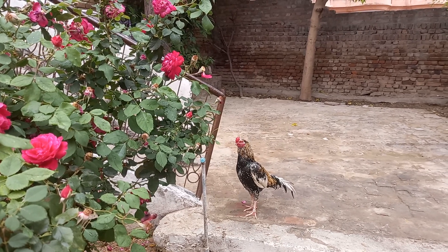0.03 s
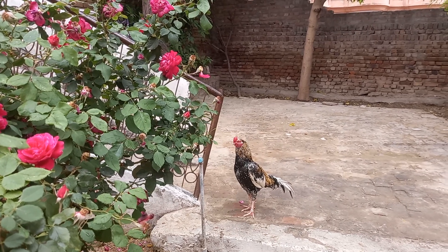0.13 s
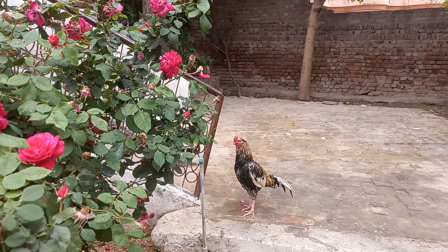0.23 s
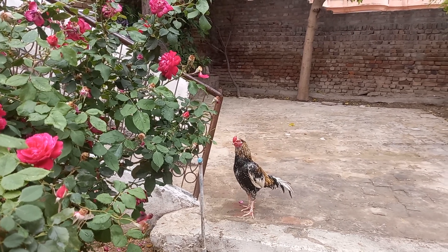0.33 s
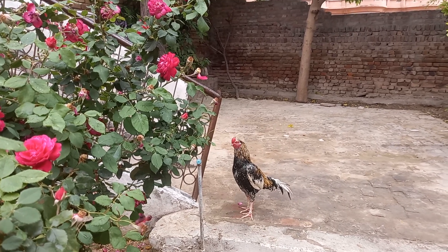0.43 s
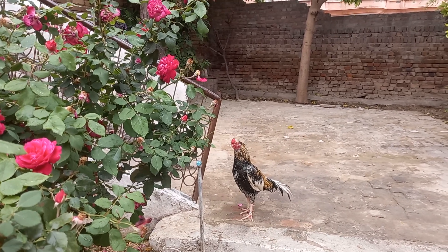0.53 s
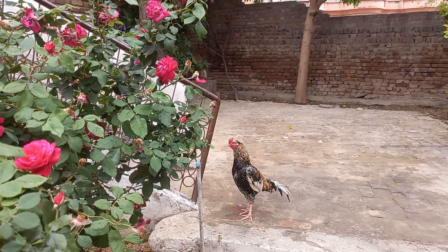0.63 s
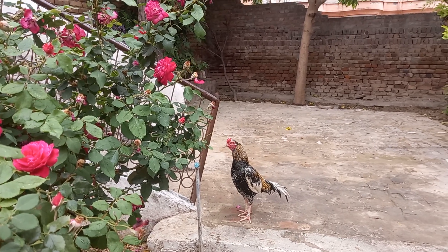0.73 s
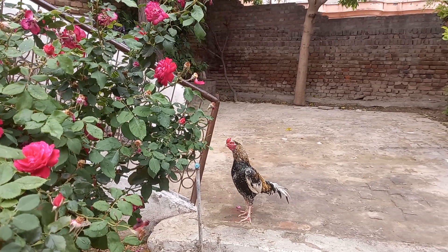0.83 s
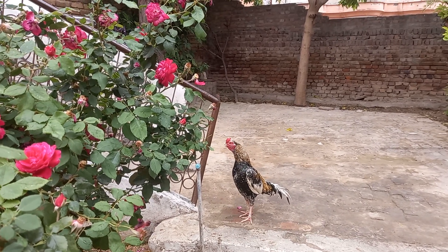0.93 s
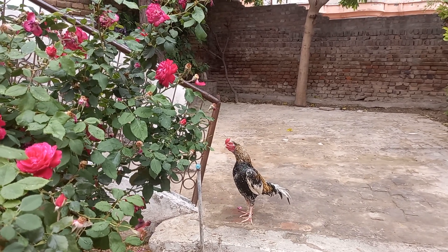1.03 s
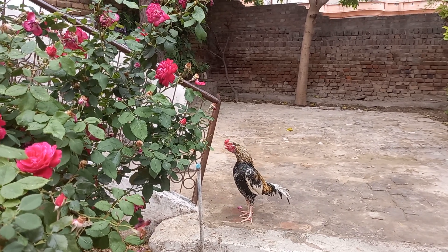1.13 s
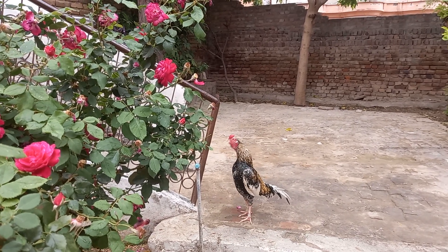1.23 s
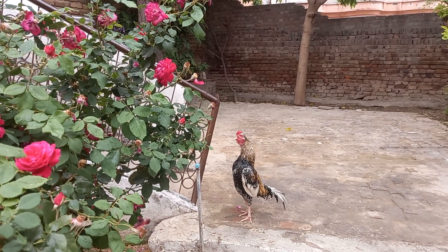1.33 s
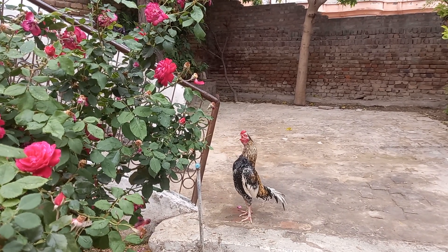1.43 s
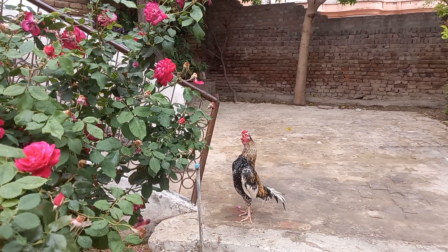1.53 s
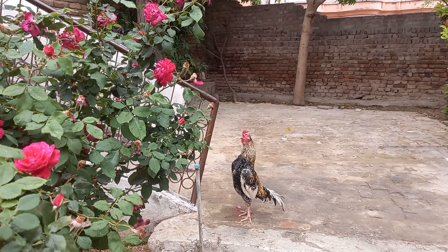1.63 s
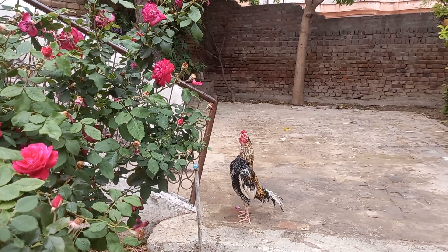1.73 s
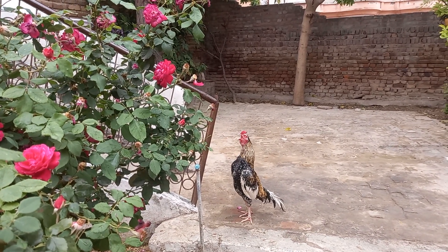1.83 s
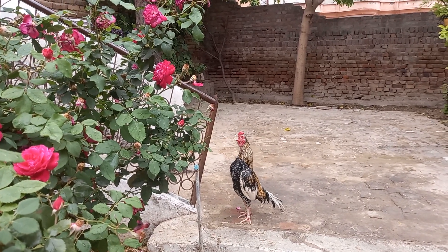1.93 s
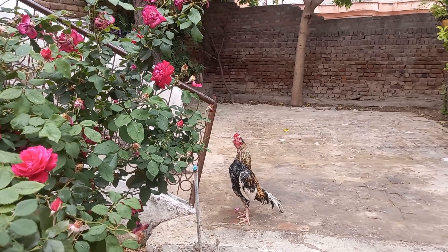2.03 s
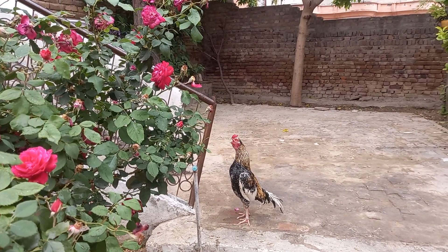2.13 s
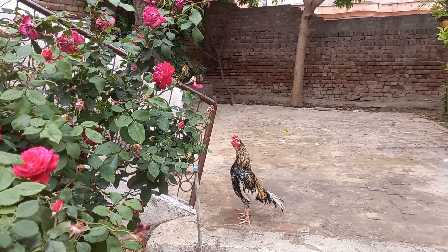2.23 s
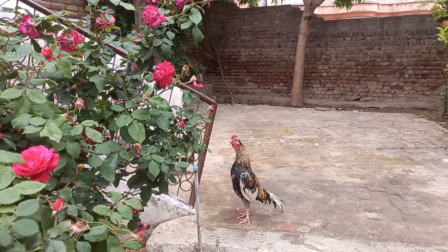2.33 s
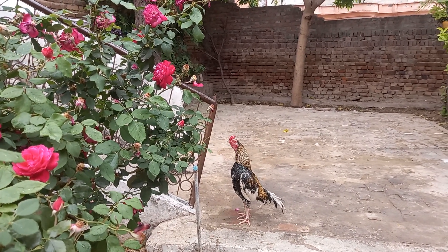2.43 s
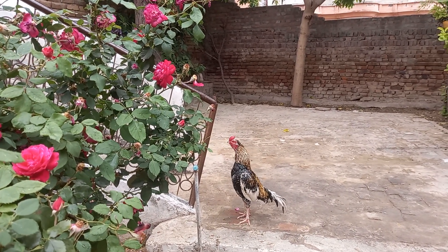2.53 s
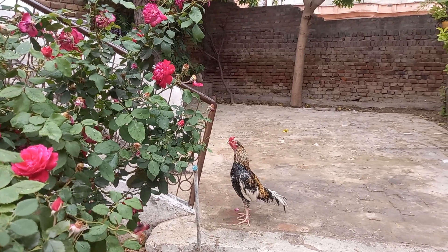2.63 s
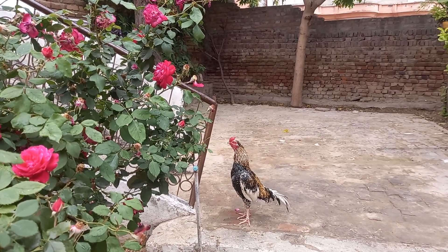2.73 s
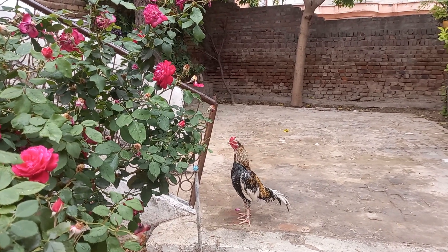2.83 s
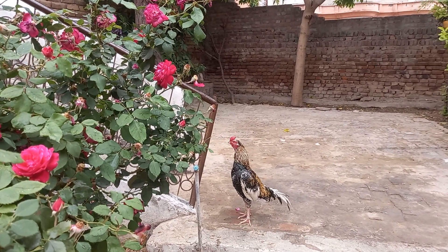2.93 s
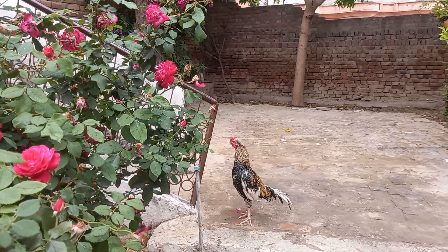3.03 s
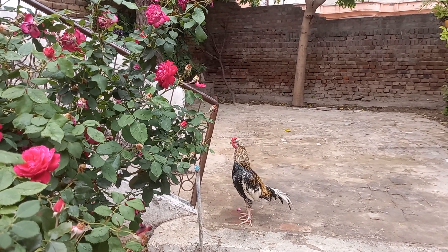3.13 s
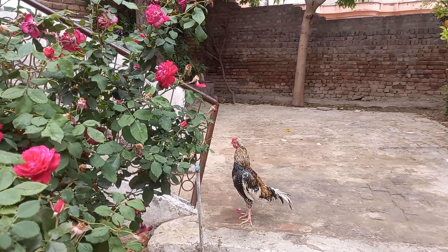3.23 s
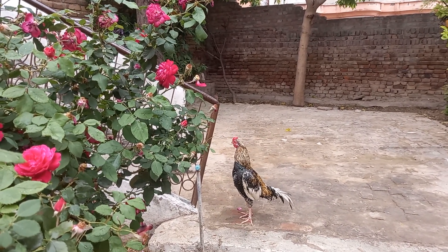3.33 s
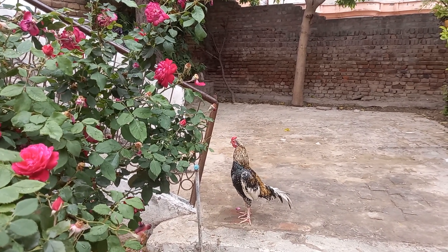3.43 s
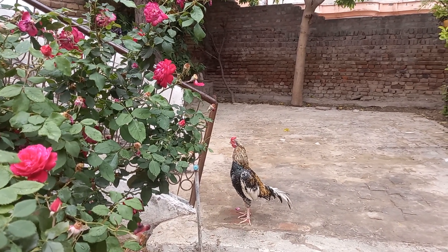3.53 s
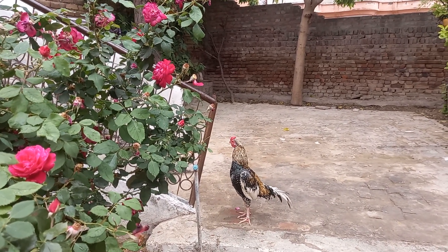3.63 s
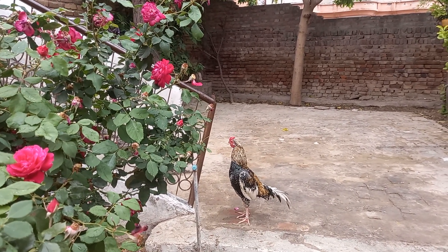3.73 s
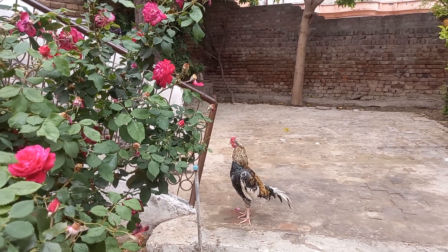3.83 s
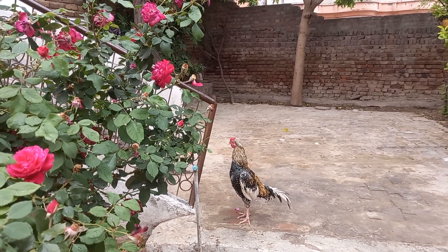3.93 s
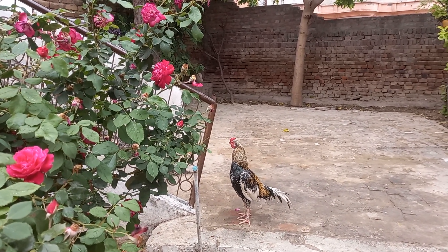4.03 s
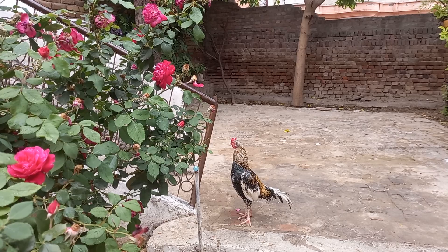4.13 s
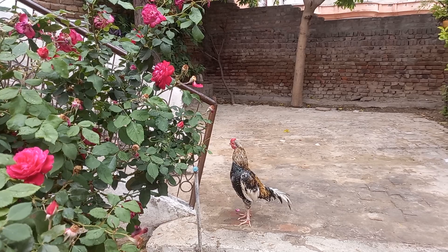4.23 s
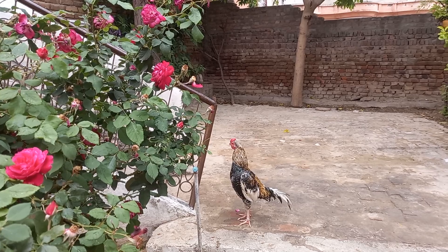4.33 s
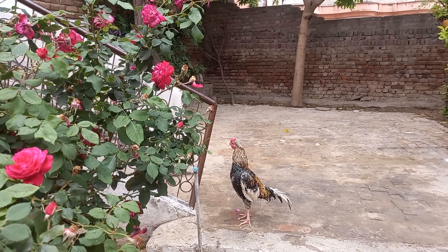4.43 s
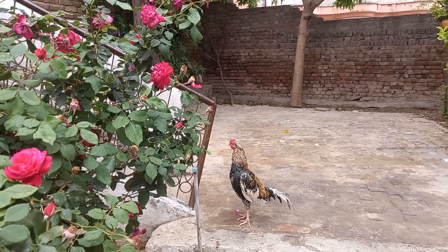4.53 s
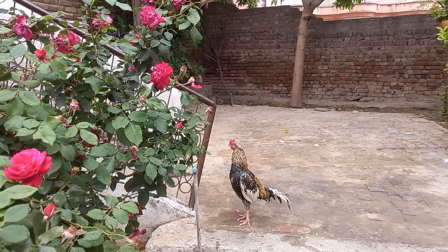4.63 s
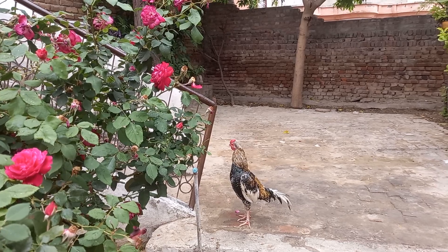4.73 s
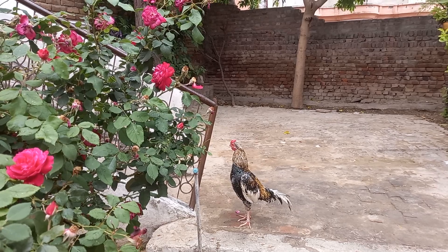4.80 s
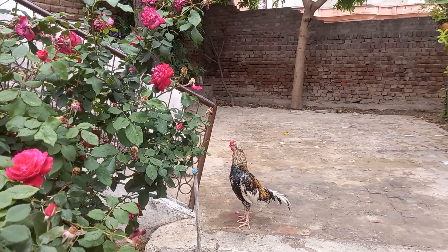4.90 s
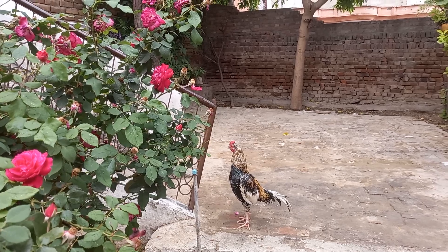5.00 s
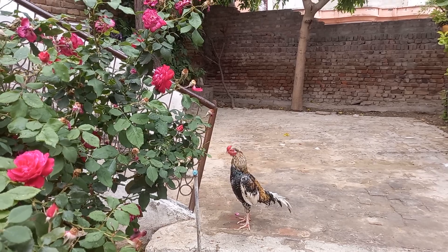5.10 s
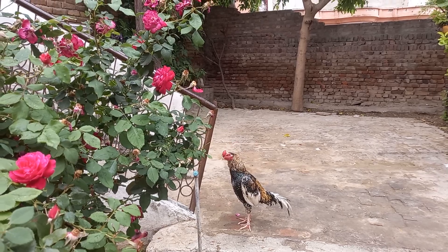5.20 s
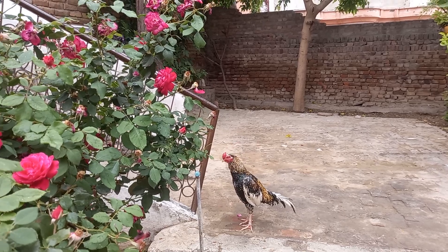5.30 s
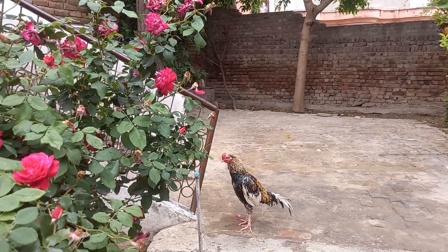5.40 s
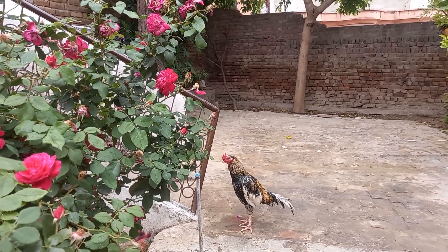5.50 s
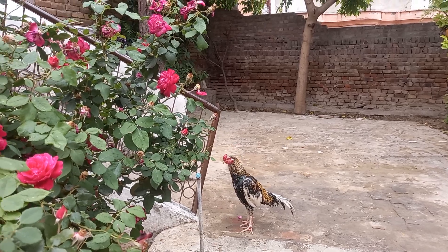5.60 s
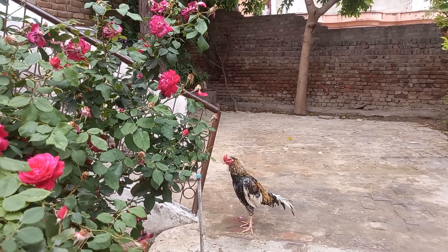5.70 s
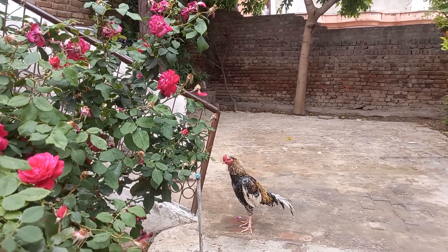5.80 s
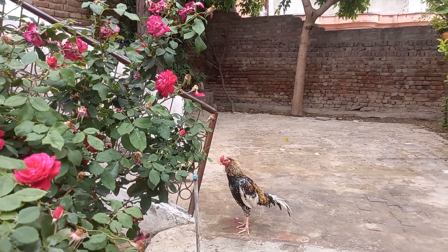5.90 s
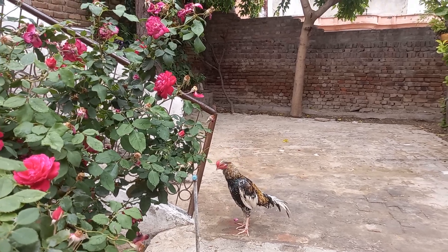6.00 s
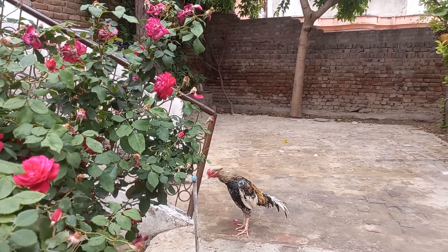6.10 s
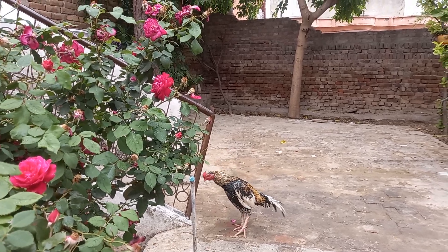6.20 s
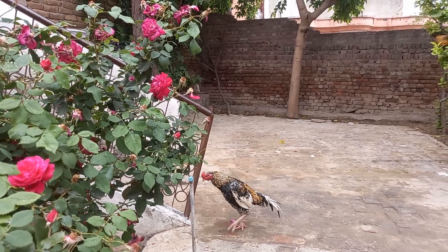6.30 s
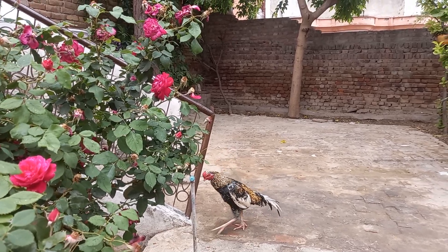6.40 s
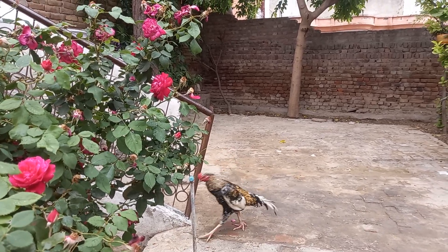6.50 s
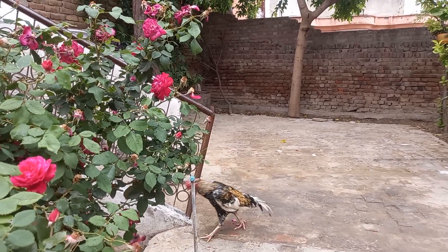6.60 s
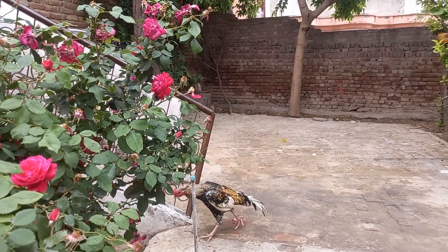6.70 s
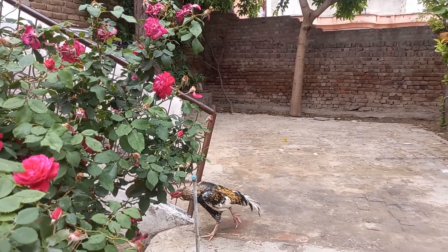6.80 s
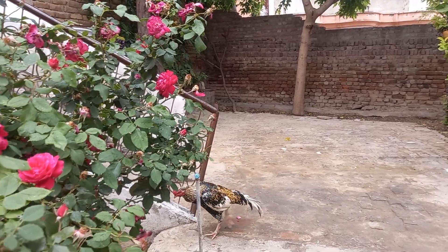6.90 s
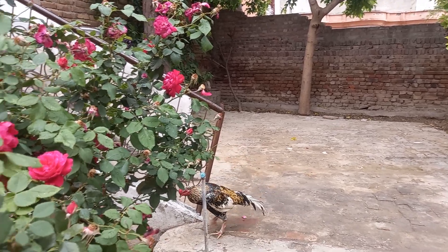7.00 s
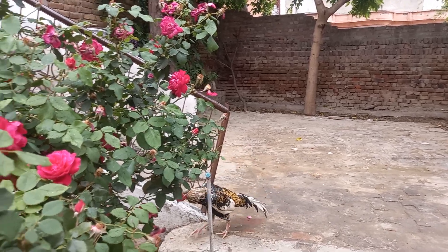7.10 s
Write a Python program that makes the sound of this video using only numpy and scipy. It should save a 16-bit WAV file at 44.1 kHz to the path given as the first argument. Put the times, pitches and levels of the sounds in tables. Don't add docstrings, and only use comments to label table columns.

```python
import sys
import numpy as np
from scipy import signal
from scipy.fft import rfft, irfft, next_fast_len
from scipy.io import wavfile
from scipy.ndimage import uniform_filter1d, minimum_filter1d, map_coordinates

SR = 44100
rng = np.random.default_rng(int(sys.argv[2]) if len(sys.argv) > 2 else 0)


def generate_wav(sig):
    pcm = np.round(np.clip(np.atleast_2d(sig).T, -1, 1) * 32767).astype(np.int16)
    wavfile.write(sys.argv[1], SR, pcm)


def volts_from_decibels(level):
    exponent = np.asarray(level, float) / 20
    return 10 ** exponent


N = 315315


def unit(x):
    return x / np.sqrt(np.mean(x ** 2) + 1e-20)


def along(points, hz):
    f, v = np.transpose(points)
    return np.interp(np.log(hz + 1), np.log(f + 1), v)


def over_time(points, at_s):
    return np.interp(at_s, *np.transpose(points))


def closed(points):
    return lambda hz: volts_from_decibels(along(points, hz)) * (hz > points[0][0]) * (hz < points[-1][0])


def span(rows):
    s, *cols = np.transpose(rows)
    at = np.arange(max(round(s[0] * SR), 0), min(round(s[-1] * SR), N))
    return at[0], [np.interp(at / SR, s, c) for c in cols]


def add(track, start, sound, pan_db):
    sides = volts_from_decibels([[pan_db / 2], [-pan_db / 2]])
    track[:, start:start + len(sound)] += (sides * sound)[:, :N - start]


def bumps(rows):
    t = np.arange(N) / SR
    return sum(volts_from_decibels(db) * np.sin(np.pi * np.clip((t - s) / length, 0, 1)) for s, length, db in rows)


def wobble(rate, size):
    knots = rng.standard_normal(int(size * rate / SR) + 4)
    return unit(map_coordinates(knots, [np.arange(size) * rate / SR]))


def filtered(x, response):
    m = next_fast_len(x.shape[-1] + 8192)
    return irfft(rfft(x, m) * response(np.fft.rfftfreq(m, 1 / SR)), m)[..., :x.shape[-1]]


def shaken(rough, rate, size):
    share = np.clip(rough, 0, 1)
    noise = wobble(rate, size) + 1j * wobble(rate, size)
    return np.sqrt(1 - share) + np.sqrt(share / 2) * noise


# frequency_hz, likeness (0-1)
LIKENESS = [(90, 0.4), (200, .8), (1000, 0.4), (3000, 0.1), (12000, 0.5)]


def rush(spectrum, patchy_db):
    z = signal.stft(rng.standard_normal((2, N)), nperseg=512)[2]
    field = uniform_filter1d(rng.standard_normal(z.shape[1:]), size=4, axis=0)
    field = uniform_filter1d(field, size=12, axis=1)
    pair = signal.istft(z * volts_from_decibels(patchy_db * unit(field)), nperseg=512)[1][:, :N]

    def mid_side(hz):
        turn = np.arccos(np.clip(along(LIKENESS, hz), -1, 1)) / 2
        return closed(spectrum)(hz) * [np.cos(turn), np.sin(turn)]

    mid, side = filtered(pair, mid_side)
    return unit(np.array([mid + side, mid - side]))


def note(out, rows, overtone_db, rasp, pan_db):
    start, (hz, db) = span(rows)
    phase = 2 * np.pi * np.cumsum(hz) / SR
    parts = [0, overtone_db] + [k * min(overtone_db, 0) - 4.5 for k in range(2, 5)]
    tone = 0
    for k, part_db in enumerate(parts, 1):
        line = shaken(rasp, 450 * k, len(hz)) * np.exp(1j * k * phase)
        tone = tone + volts_from_decibels(part_db) * line * (k * hz < SR / 2.7)
    soft = np.minimum(np.arange(len(hz)) / (SR / 1000), 1)
    add(out, start, np.sqrt(2) * soft * volts_from_decibels(db) * tone.real, pan_db)


# frequency_hz, t60_s
WALL_RING = [(300, 3.76), (800, 1.075), (1600, 1.345), (3000, 0.74), (6500, 0.52), (10000, 0.011)]


def yard(x, delay, shared, early):
    hz, t, z = signal.stft(rng.standard_normal((3, int(1.8 * SR))), SR, nperseg=256)
    fade = volts_from_decibels(-60 * t / along(WALL_RING, hz)[:, None]) + early * volts_from_decibels(-60 * t / 0.27)
    tail = signal.istft(z * fade, SR, nperseg=256)[1]
    tail = shared * tail[2] + tail[:2]
    late = np.pad(tail / np.linalg.norm(tail[0]), ((0, 0), (round(delay * SR), 0)))
    return signal.fftconvolve(x, late, axes=1)[:, :N]


def aside(x, lead):
    ports = np.array([[1], [-1]])
    return filtered(x, lambda hz: np.exp(1j * np.pi * hz * lead / SR * ports))


# time_s, gain_db
CAMERA_GAIN = [(0, 5.5), (.5, 2), (1.25, 2.5), (1.4, -12.5), (2.3, -7.5), (3.0, -28.5), (3.45, -12.5),
               (3.95, -8.5), (4.22, 1), (4.8, -2.5), (5.4, 6), (7.15, -1)]


def camera_gain():
    return over_time(CAMERA_GAIN, np.arange(N) / SR)


# frequency_hz, density_db_per_hz
RUMBLE_COLOUR = [(15, -59.5), (25, -52.5), (81, 8.5), (130, -5.5), (183, -23), (220, -46.5), (290, -55.5),
                 (480, -120)]
# start_s, length_s, level_db
WHEEL_PASSES = [(0, 0.058, -29), (0.08, 0.17, -36.5), (1.225, 0.12, -30.5), (3.5, 0.13, -53),
                (4.05, 0.17, -43), (4.5, 0.16, -33.5), (4.95, 0.28, -39), (5.45, 0.14, -43),
                (5.72, 0.16, -34.5), (6.05, 0.15, -44), (6.65, 0.57, -46.5)]


def traffic_rumble(gain_db):
    level = volts_from_decibels(-54 + 0.97 * gain_db) + bumps(WHEEL_PASSES)
    lumps = volts_from_decibels(4.2 * wobble(5.8, N))
    return level * unit(lumps * rush(RUMBLE_COLOUR, patchy_db=1.0)) * volts_from_decibels([[-1.8], [1.8]])


# frequency_hz, density_db_per_hz
STREET_COLOUR = [(88, -22.5), (150, -1), (472, -8.5), (613, -8.5), (779, -12), (1230, -19.5), (2600, -26),
                 (3380, -69), (5720, -120)]
# frequency_hz, density_db_per_hz
AIR_COLOUR = [(14300, -12.5), (15200, -4), (15900, -7)]


def street_and_air(gain_db):
    air = volts_from_decibels(-70 + gain_db) * rush(AIR_COLOUR, patchy_db=0.5)
    return air + volts_from_decibels(-50.5 + gain_db) * rush(STREET_COLOUR, patchy_db=5.0)


# start_s, length_s, level_db
DRONE_SWELLS = [
    (.7, 0.7, -45.5),
    (3.3, 0.3, -56),
    (3.85, 0.61, -52.5),
    (4.52, 0.22, -45.5),
    (5.33, 0.37, -43),
    (6.05, 0.22, -44),
]


def traffic_drone(gain_db):
    out = np.zeros((2, N))
    steady = volts_from_decibels(-61.5 + gain_db)
    drone = steady + bumps(DRONE_SWELLS)
    octave = volts_from_decibels(-8) * np.sqrt(drone * steady)
    for order, level in [(1, drone), (2, octave)]:
        line = np.exp(2j * np.pi * order * 615.7 * np.arange(N) / SR)
        add(out, 0, np.sqrt(2) * level * np.real(shaken(0.83, 24.68, N) * line), pan_db=-8.0)
    return out


# start_s, length_s, pitch_hz, level_db
FAR_HUMS = [(0.07, 0.24, 834, -44.5), (0.511, 0.24, 290, -46), (0.721, 0.27, 909, -44.5),
            (1.103, 0.2, 909, -47.5), (2.851, 0.59, 1221, -68), (3.85, 0.61, 138, -48),
            (5.093, 0.54, 1715, -66.5), (3.981, 0.58, 311.6, -55.5), (4.102, 0.22, 1454, -62),
            (5.079, 0.28, 916, -55), (6.058, 0.27, 784, -56.5), (6.19, 0.17, 1560, -59),
            (6.88, 0.13, 395.3, -46.5)]


def far_hums():
    out = np.zeros((2, N))
    for s, length, hz, db in FAR_HUMS:
        t = np.arange(round(length * SR)) / SR
        line = np.sin(np.pi * t / length) * np.exp(2j * np.pi * hz * t)
        add(out, round(s * SR), 2 * volts_from_decibels(db) * np.real(shaken(1.0, 31.2, len(t)) * line), pan_db=3.5)
    return out


# frequency_hz, density_db_per_hz
TWITTER_COLOUR = [(1900, -26), (2600, -7.5), (3300, -5.5), (4000, -5), (5500, -5.5), (6500, -10.5),
                  (7500, -30), (14000, -51), (15200, -15.5), (15900, -24.5)]
# time_s, level_db
FLOCK_LEVEL = [(0, -32), (0.601, -48), (1.199, -40.5), (1.7, -52.5), (2.3, -47), (2.9, -60.5), (3.601, -66),
               (3.69, -32), (4.2, -60), (7.15, -55)]


def far_flock():
    level = volts_from_decibels(over_time(FLOCK_LEVEL, np.arange(N) / SR))
    return level * rush(TWITTER_COLOUR, patchy_db=3.5)


# time_s, level_db
RUSTLE_LEVEL = [(6.6, -101.5), (6.7, -43), (6.78, -39.5), (6.95, -44.5), (7.05, -54), (7.15, -86.5)]
# frequency_hz, density_db_per_hz
LEAF_COLOUR = [(600, 5), (1000, -1.5), (2500, -1.5), (5000, 0), (7500, -8)]


def leaves():
    out = np.zeros((2, N))
    start, (db,) = span(RUSTLE_LEVEL)
    brush = unit(volts_from_decibels(2 * wobble(300, N)) * rush(LEAF_COLOUR, patchy_db=3))
    out[:, start:start + len(db)] += volts_from_decibels(db) * brush[:, :len(db)]
    return out


# start_s, level_db, pitch_hz
HEN_CLUCKS = [
    (.43, -27.5, 228.4),
    (0.702, -27.5, 219.7),
    (0.981, -31, 215.4),
    (3.77, -44, 227.2),
]


def hen():
    out, t = np.zeros((2, N)), np.arange(SR // 10) / SR
    ends = np.minimum(t / 0.0085, 1) * np.minimum((.1 - t) / 0.017, 1)
    for s, db, hz in HEN_CLUCKS:
        phase = 2 * np.pi * hz * (t - 0.4 * t * t)
        voice = 0
        for k in range(3, 10):
            throat_db = -9 * np.log2(k * hz / 1200) ** 2 * 3.6
            voice = voice + np.real(shaken(0.96, 150, len(t)) * np.exp(1j * k * phase)) * volts_from_decibels(throat_db)
        add(out, round(s * SR), volts_from_decibels(db - 60 * t / 0.084) * ends * voice, pan_db=1.0)
    return out


# time_from_drop_s, pitch_hz, level_db
WHISTLE_FALL = [(-.06, 4580, -25.5), (-.05, 4520, -15), (-.028, 4350, -14.5), (-.012, 4200, -4),
                (-.002, 4000, -6), (.005, 3580, -3), (0.013, 3380, 2), (0.038, 3319, -5.5),
                (.085, 2810, -30.5)]
# drop_s, level_db, pitch_factor, lead_in_stretch (of the level part before the drop)
WHISTLE_CALLS = [
    (0.278, -28, 1.016, 0.2),
    (0.746, -30, 0.98, 0.38),
    (1.1, -36, 1.1, 0.32),
    (1.583, -41.5, 0.97, 0.27),
    (4.147, -37, 1.045, 0.37),
    (4.59, -33, 1.016, 2.67),
    (5.043, -27, 1.0, .8),
    (5.432, -24.5, 0.99, 0.7),
    (5.833, -26, 0.99, 1.7),
    (6.708, -29, .98, 0.78),
]


def whistles():
    out = np.zeros((2, N))
    for s, db, pitch, lead in WHISTLE_CALLS:
        rows = []
        for t, hz, level in WHISTLE_FALL:
            held = min(t + .028, 0)
            rows.append((s + t + held * (lead - 1), hz * pitch, db + level))
        note(out, rows, overtone_db=-34, rasp=.2, pan_db=.6)
    return out


# start_s, level_db,
# length_s
SCOLDING = [(.002, -25.5, 0.038), (0.055, -21, 0.055), (0.124, -20, 0.043), (0.2, -19.5, 0.036),
            (0.272, -24, 0.06), (0.358, -28, 0.088), (0.43, -23, 0.061), (0.53, -27, 0.077),
            (2.82, -54, 0.067), (2.77, -39, 0.042), (6.627, -51.5, .012), (3.628, -37.5, 0.024),
            (3.84, -42, 0.041), (4.5, -54.5, 0.027), (0.81, -23, 0.082)]
# frequency_hz, density_db_per_hz
BEAK_COLOUR = [(1200, -16.5), (1500, -8.5), (3000, -2), (5000, -3), (6500, 0), (8000, -7.5), (10000, -10.5),
               (13000, -47), (15500, -9.5)]


def chatter():
    swell = np.zeros(N)
    for s, db, length in SCOLDING:
        u = np.clip((np.arange(N) / SR - s) / length, 0, 1)
        swell += volts_from_decibels(db) * np.sin(np.pi * u ** .65) ** 2
    return swell * unit(rush(BEAK_COLOUR, patchy_db=1) * volts_from_decibels(3 * wobble(400, N)))


# start_s, length_s, middle_hz, swings_per_s, level_db
WARBLES = [
    (0.852, .065, 2870, 60, -20.5),
    (3.632, .05, 2932, 62, -31.5),
]


def warbles():
    out = np.zeros((2, N))
    for s, length, mid_hz, rate, db in WARBLES:
        t = np.linspace(0, length, num=40)
        hz = mid_hz - 172 * np.cos(2 * np.pi * rate * t)
        level_db = db - 16 * (t / length) ** 2 - 18 * np.exp(-t / 0.0027)
        note(out, np.transpose([s + t, hz, level_db]), overtone_db=2, rasp=0.55, pan_db=3.0)
    return out


# start_s, length_s, from_hz, to_hz, peak_db
SPARROW_CHIRPS = [
    (0.819, .055, 2603, 2185, -22.5),
    (0.857, 0.011, 3420, 2730, -36.5),
    (2.745, 0.026, 2503, 1928, -42.5),
    (2.774, .022, 2570, 1890, -40.5),
    (3.6, 0.0075, 2155, 2190, -38.5),
    (3.621, 0.0065, 2394, 2202, -40.5),
    (3.65, 0.033, 3694, 3624, -31.5),
    (0.85, 0.03, 4445, 3930, -27.5),
    (0.883, 0.013, 3840, 3204, -24.5),
]
# start_s, length_s, from_hz, to_hz, peak_db
SOFT_PEEPS = [
    (3.61, 0.043, 2270, 2650, -49.5),
    (4.649, 0.044, 2510, 2600, -59),
    (4.792, 0.04, 2280, 2450, -67),
    (4.947, 0.044, 2357, 2410, -55.5),
    (5.335, 0.13, 4900, 4980, -58.5),
    (5.36, .12, 5350, 5480, -59),
    (5.06, 0.09, 5070, 5000, -58),
    (5.22, 0.089, 5420, 5700, -64.5),
    (5.701, 0.15, 5017, 5360, -61.5),
    (6.42, 0.03, 6370, 6140, -77.5),
]
# start_s, length_s,
# from_hz, to_hz, peak_db
ROUGH_STREAKS = [(3.444, 0.014, 7050, 6557, -35.5), (3.444, 0.016, 5060, 4750, -49),
                 (3.625, 0.01, 4760, 4440, -23), (5.962, 0.034, 5250, 6300, -34),
                 (3.656, 0.03, 4640, 4200, -27.5), (5.95, 0.054, 4950, 5320, -30.5),
                 (5.95, 0.046, 5820, 5970, -33.5), (1.135, 0.095, 2973, 2637, -36),
                 (1.165, 0.11, 3823, 3190, -32.5), (3.43, 0.0694, 1976, 2680, -53.5),
                 (4.61, 0.33, 7030, 6277, -60), (5.06, 0.091, 7000, 6310, -53.5),
                 (5.438, 0.11, 6920, 6600, -44.5), (5.838, 0.14, 6130, 6380, -50),
                 (6.259, 0.07, 6660, 6630, -47)]
# start_s, length_s, from_hz, to_hz, peak_db
LOW_PIPES = [
    (0.084, 0.094, 3190, 2492, -31.5),
    (.005, 0.1, 2477, 2497, -43),
    (0.037, 0.065, 3170, 3168, -31),
    (.23, .14, 2460, 2465, -44),
    (0.371, 0.11, 3230, 3140, -39.5),
    (0.421, 0.042, 2976, 2630, -44),
]
# start_s, length_s, from_hz, to_hz, peak_db
CLEAR_SLIDES = [(2.96, .13, 3990, 3500, -57), (2.96, .11, 6100, 5200, -65), (3.3, 0.082, 2300, 1950, -56),
                (3.296, 0.012, 3250, 3400, -52), (3.314, 0.024, 4350, 2950, -49),
                (2.747, .016, 4900, 4050, -46), (2.778, .016, 5000, 3900, -45),
                (3.606, .042, 2100, 2950, -38), (1.099, 0.026, 3220, 3120, -31),
                (.772, .05, 3050, 2450, -33), (.712, .036, 4400, 3400, -37), (5.806, .028, 4250, 3600, -36)]
# overtone_db, rasp (0-1), attack_share of the length, fade_db, glide_haste
CALL_KINDS = [
    (-1.5, 0.8, 0.21, 14.5, 1.5),
    (-16.5, 0.1, 0.082, 6, 2),
    (-29, 0.99, 0.21, 27, 4),
    (-30, 0.08, 0.17, 10.5, 12),
    (-25.5, 0.05, 0.14, 7, 0.94),
]


def glides():
    out, u = np.zeros((2, N)), np.linspace(0, 1, num=25)
    flocks = [SPARROW_CHIRPS, SOFT_PEEPS, ROUGH_STREAKS, LOW_PIPES, CLEAR_SLIDES]
    for calls, (overtone_db, rasp, attack, fade_db, haste) in zip(flocks, CALL_KINDS):
        swell_db = np.where(u < attack, -22 * (1 - u / attack), -fade_db * (u - attack))
        for s, length, from_hz, to_hz, db in calls:
            hz = to_hz + (from_hz - to_hz) * (1 - u) ** haste
            note(out, np.transpose([s + u * length, hz, db + swell_db]), overtone_db, rasp, pan_db=3.5)
    return out


# time_from_top_s, pitch_over_top, level_db
ARCH_SHAPE = [(-.054, .545, -24), (-.038, .62, -12), (-.025, .77, -3), (-.0135, .915, -1), (0, 1.0, -1),
              (.01, .955, -5), (.021, .845, -8), (.034, .78, -16), (.05, .76, -32)]
# top_s, level_db, top_hz, stretch, upper_voice_over_lower_hz
ARCH_CALLS = [
    (6.014, -15, 4492, 1.07, 402),
    (6.232, -15.5, 4027, 1.3, 535),
]
UPPER_OCTAVES = [-22, -36]


def arches():
    out = np.zeros((2, N))
    for (s, db, top_hz, stretch, upper_hz), octave_db in zip(ARCH_CALLS, UPPER_OCTAVES):
        lower, upper = [], []
        for t, pitch, level in ARCH_SHAPE:
            at_s, hz = s + t * stretch, top_hz * pitch
            lower.append((at_s, hz, db + level))
            upper.append((at_s - .004, hz + upper_hz, db - 1 + 1.7 * level))
        note(out, lower, overtone_db=-40, rasp=.3, pan_db=3)
        note(out, upper, overtone_db=octave_db, rasp=.3, pan_db=9)
    flutter = np.array([wobble(120, N), wobble(120, N)])
    return out * volts_from_decibels(4 * flutter / 2)


# start_s, peak_db, pitch_hz
KNOCK_HITS = [
    (1.236, -20.5, 275),
    (1.255, -25.5, 256.5),
    (3.517, -25.5, 337),
    (3.542, -22.5, 269),
    (6.627, -73.5, 432),
]


def knocks():
    out, t = np.zeros((2, N)), np.arange(SR // 8) / SR
    for s, db, hz in KNOCK_HITS:
        low = volts_from_decibels(-60 * t / 0.083) * np.sin(2 * np.pi * hz * t)
        high = volts_from_decibels(-8.5 - 60 * t / 0.028) * np.sin(2 * np.pi * 2.9 * hz * t)
        tick = volts_from_decibels(-15 - 60 * t / 0.03) * rng.standard_normal(len(t))
        tick = filtered(tick, lambda f: 1 / (1 + (f / 1150) ** 8))
        add(out, round(s * SR), volts_from_decibels(db) * (1 - np.exp(-t / 0.0018)) * (low + high + tick), pan_db=-2.0)
    return out


# frequency_hz, level_db
THROAT_COLOUR = [(350, -48.5), (600, -5.5), (851, -3), (1270, -12.5), (1660, -8), (2150, -14.5),
                 (2530, -27.5), (3010, -16), (3240, -24), (4550, -38), (5300, -28), (6120, -21.5),
                 (7000, -36.5)]
# time_s, opening_db_per_octave over the breath's own
BEAK_GAPE = [(1.303, 16), (1.31, 4.5), (1.329, 1), (1.36, -1), (1.391, 4), (1.42, 2.5), (1.649, 0.5),
             (1.752, -2), (2.0, -1), (2.1, 0), (2.251, 2.5), (2.33, -2.5), (2.41, 1), (2.44, -3.5),
             (2.5, 0.5)]
# time_s, level_db
SECOND_HARMONIC = [(1.305, 14), (1.32, 5.5), (1.359, 9), (1.401, 5.5), (1.65, 2.2), (1.799, 3), (2.0, 0.6),
                   (2.1, 4.5), (2.27, 5), (2.319, 4), (2.398, 2), (2.425, -15.5), (2.451, -6),
                   (2.49, -11.5), (2.522, -4.5)]
# time_s, above_4400_hz_db, near_3000_hz_db
THROAT_RING = [(1.305, 17, -0.5), (1.317, 8, 3.5), (1.335, 4.5, 3), (1.36, -0.5, 4.5), (1.4, -2, -1),
               (1.64, 3.5, 1.5), (1.661, -3.5, -5), (1.69, 0.5, 1.5), (1.77, 3, 3), (1.86, 3.5, -2.5),
               (2.0, -0.5, -1), (2.272, 0.5, -2), (2.311, 2, 1.5), (2.35, -0.5, -9), (2.39, 8, -8),
               (2.43, 5.5, -4), (2.46, 2, 2), (2.49, -8, -2.5)]
CROW_FIRST = [(1.305, 868.4, -27.5, -15.5), (1.311, 835, -15.5, -8), (1.3126, 740, -9, -5),
              (1.3147, 545, -2, -8.5), (1.336, 734.5, -6, -14.5), (1.36, 739.7, -5.5, -10.5),
              (1.369, 686, -11.5, -11), (1.39, 543, -9, -17), (1.414, 538, -17.5, -16)]
CROW_SECOND = [(1.666, 835, -5.5, -30), (1.685, 858.3, -5.5, -33), (1.75, 809.4, -3.5, -38),
               (1.81, 829, -4, -33.5), (1.854, 875.3, -6, -18), (1.921, 863.7, -5, -20.5),
               (1.987, 870, -7.5, -14.5), (2.017, 793.5, -11.5, -9.5)]
CROW_SLUMP = [(2.022, 683.4, -13.5, -19.5), (2.082, 631, -15, -23), (2.088, 558.5, -22.5, -13),
              (2.106, 546, -20.5, -11)]
CROW_THIRD = [(2.235, 795, -34.5, -11.5), (2.248, 815.7, -21.5, -11), (2.26, 820, -15, -7.5),
              (2.265, 599, -14.5, -20), (2.292, 678, -6, -21)]
CROW_TOP = [(2.298, 780, -4.5, -18), (2.324, 813, -7.5, -32), (2.386, 804, -5.5, -35.5),
            (2.397, 821, -5, -30.5), (2.412, 798, -4, -31.5), (2.427, 796, -8.5, -29),
            (2.447, 779.7, -8.5, -25), (2.463, 768, -5, -28), (2.486, 735.6, -8.5, -29)]
CROW_GULP = [(2.522, 734, -16, -26), (2.528, 730, -8.5, -41), (2.548, 662, -24, -28)]
CROW_HELD = [(1.366, 726.3, -6.5, -8), (1.378, 731.4, -12.5, -10.5), (1.395, 734, -13.5, -13),
             (1.415, 741, -7.5, -13.5)]
CROW_OPENING = [(1.63, 858, -21, -8), (1.6335, 848, -12.5, -0.5), (1.637, 597, -10, -9),
                (1.645, 671.5, -5.5, -4), (1.655, 681, -5, -20), (1.664, 721, -2.5, -26)]
# opening_db_per_octave, hollow_3500_4400_hz_db, ring_above_4400_hz_db, harmonics_above_7000_hz_db
BREATH_COLOURS = [
    (-5, -7.5, 7.5, -44),
    (4, -7, -1.5, -45.5),
    (3.5, 3, -2.5, -41),
    (2, 4.5, 8.5, -42.5),
    (1.5, -15.5, 6.5, -34),
    (-20, 9, -9, -65.5),
    (-14, -5, 9.5, -50),
    (2, 1.5, 6.5, -43),
]


def rooster():
    out = np.zeros((2, N))
    breaths = [CROW_FIRST, CROW_SECOND, CROW_SLUMP, CROW_THIRD, CROW_TOP, CROW_GULP, CROW_HELD, CROW_OPENING]
    for rows, (open_db, hollow_db, ring_db, shrill_db) in zip(breaths, BREATH_COLOURS):
        (s0, hz0, db0, n0), (s1, hz1, db1, n1) = rows[0], rows[-1]
        onset = (s0 - 0.003, hz0, db0 - 23.0, n0)
        release = (s1 + 0.035, hz1, db1 - 58, n1)
        start, (hz, db, noise_db) = span([onset] + list(rows) + [release])
        size = len(hz)
        at_s = (start + np.arange(size)) / SR
        open_db = open_db + 8 * np.log2(hz / hz.mean()) + over_time(BEAK_GAPE, at_s)
        tuned_db = over_time(SECOND_HARMONIC, at_s)
        ring_s, *ring_columns = np.transpose(THROAT_RING)
        bright_db, third_db = [np.interp(at_s, ring_s, c) for c in ring_columns]
        phase = 2 * np.pi * np.cumsum(hz * (1 + 0.0049 * wobble(60, size))) / SR
        depth = np.minimum(volts_from_decibels(noise_db + 3 + 3.5 * wobble(70, size)), .4)
        rattle = 1 + depth * np.cos(phase / 2 + 0.5 * wobble(90, size))
        for k in range(1, 24):
            f = k * hz
            middle_db = np.where(f > 3550, hollow_db, third_db * (f > 2750))
            throat_db = along(THROAT_COLOUR, f) + open_db * np.log2(min(k, 3))
            throat_db = throat_db + np.where(f > 4400, ring_db + bright_db, middle_db) + (k == 2) * tuned_db
            waver_db = 3.36 * (k > 2) * wobble(25.1, size)
            gain = volts_from_decibels(db + np.where(f < 7000, throat_db, shrill_db) + waver_db)
            gain = gain * (rattle if k > 1 else 1) * (f < SR / 2.6)
            line = shaken(volts_from_decibels(2 * noise_db) * k ** 1.2, 450, size) * np.exp(1j * k * (phase + k * .5))
            add(out, start, np.sqrt(2) * gain * line.real, pan_db=-0.5)
    return filtered(out, lambda hz: 1 / (1 + (470 / (hz + 1)) ** 16))


# frequency_hz, level_db
BEAK_BEAM = [(2500, -.5), (3200, -3), (4000, -14), (5200, -4), (6500, -5)]


def scene():
    gain_db = camera_gain()
    background = traffic_rumble(gain_db) + street_and_air(gain_db) + traffic_drone(gain_db)
    background = background + far_hums() + far_flock() + leaves()
    birds, far, rasps = warbles() + glides() + hen(), whistles(), chatter()
    close, taps, crow = arches(), knocks(), volts_from_decibels(8.5) * rooster()

    to_walls = filtered(crow, lambda hz: volts_from_decibels(along(BEAK_BEAM, hz)))
    front = crow + volts_from_decibels(-7.5) * yard(to_walls, delay=0.016, shared=0.33, early=12.0)
    front = front + taps + volts_from_decibels(-23.5) * yard(taps, delay=0.013, shared=1.5, early=1.0)

    calls = birds + volts_from_decibels(-2.0) * far
    slap = volts_from_decibels(-10) * np.roll(calls[::-1], round(.008 * SR), axis=1)
    left = volts_from_decibels(4) * (calls + slap) + rasps
    bird_send = birds + volts_from_decibels(-9.0) * rasps + volts_from_decibels(-7) * close
    left = left + volts_from_decibels(4.0) * yard(bird_send, delay=0.011, shared=0.07, early=2.32)
    left = left + volts_from_decibels(2.5) * yard(far, delay=0.016, shared=0.2, early=1.0)
    return aside(front, lead=3.486) + aside(left, lead=17.3) + aside(volts_from_decibels(4.5) * close, lead=11.3) + background


def band_limit(x):
    return signal.sosfilt(signal.butter(12, 16830, fs=SR, output="sos"), x)


# frequency_hz, level_db
MIC_RESPONSE = [(6300, 1.5), (6800, -7.5), (7300, -34), (12000, -13), (14000, -27), (15300, -10.5),
                (16000, -25)]


def record(dry):
    x = filtered(dry, lambda hz: volts_from_decibels(along(MIC_RESPONSE, hz)))
    power = np.abs(uniform_filter1d(np.mean(x ** 2, axis=0), size=SR // 200))
    over_db = np.maximum(10 * np.log10(power + 1e-12) + 20, 0)
    held_db = -minimum_filter1d(-over_db, size=SR // 70)
    held_db = uniform_filter1d(held_db, size=SR // 90)
    x = x * volts_from_decibels(-.55 * held_db)
    x = x / (1 + np.abs(x / 1.03) ** 6) ** (1 / 6)
    return band_limit(x)


dry = scene()
out = record(dry)
generate_wav(out)
```